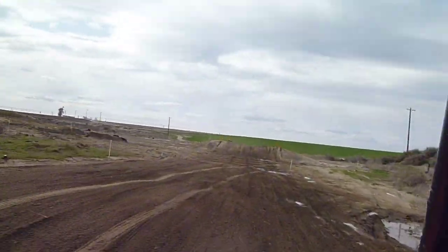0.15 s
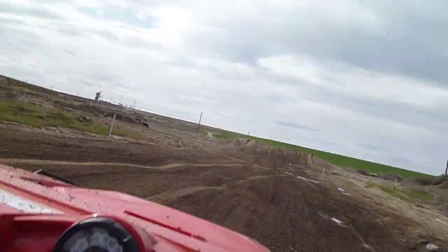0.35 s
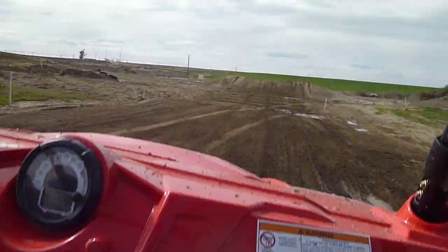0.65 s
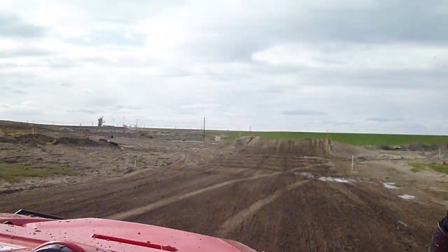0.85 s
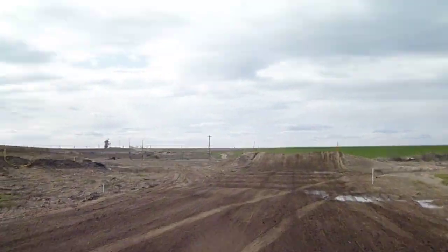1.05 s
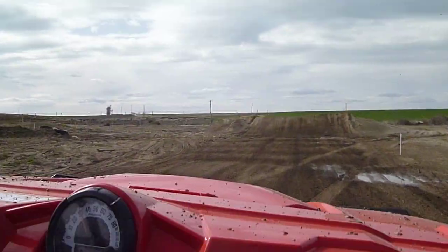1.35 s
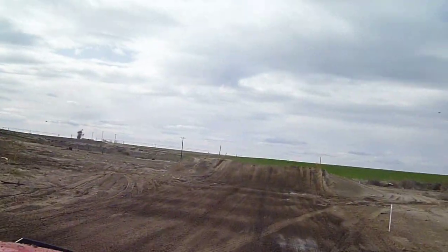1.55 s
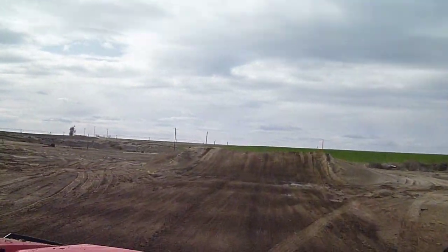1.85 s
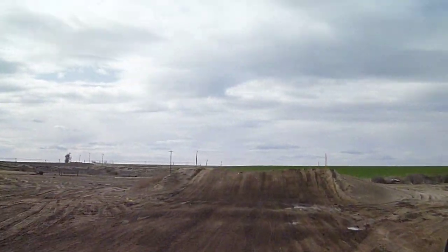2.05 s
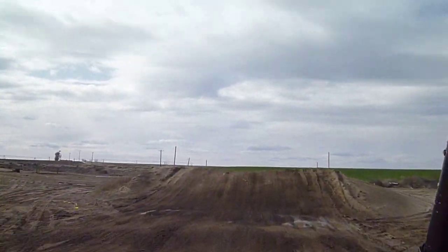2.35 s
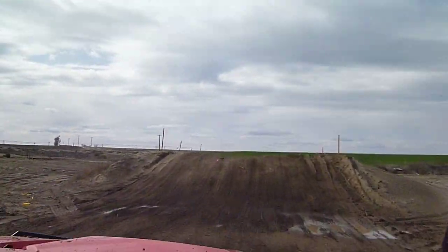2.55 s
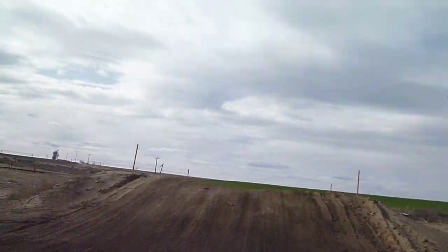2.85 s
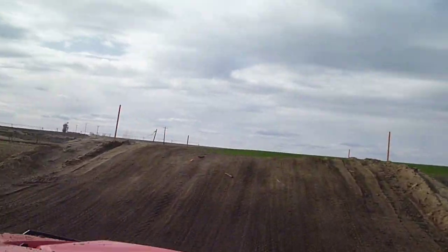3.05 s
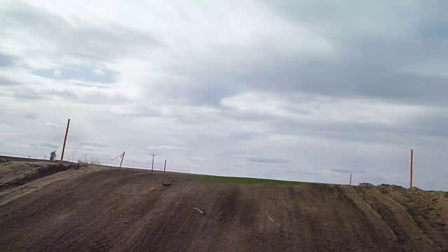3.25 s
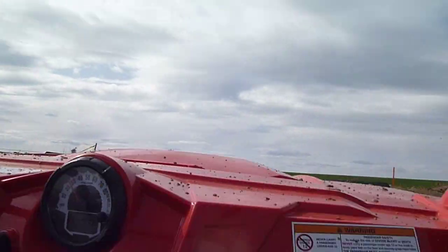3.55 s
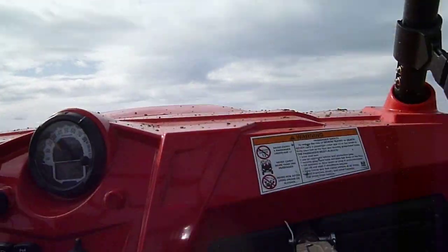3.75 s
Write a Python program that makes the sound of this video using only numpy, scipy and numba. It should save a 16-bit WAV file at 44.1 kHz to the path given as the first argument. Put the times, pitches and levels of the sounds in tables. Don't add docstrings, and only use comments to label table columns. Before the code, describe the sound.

A small off-road buggy engine drones, sags in pitch, then revs up sharply over a bumpy dirt track.

```python
import sys
import numpy as np
from scipy import signal
from scipy.io import wavfile
from scipy.ndimage import uniform_filter1d
from numba import njit

SR = 44100
rng = np.random.default_rng(int(sys.argv[2]) if len(sys.argv) > 2 else 0)


def persist_wave(psi):
    counts = np.round(np.clip(psi, -1, 1) * 32767).astype(np.int16)
    wavfile.write(sys.argv[1], SR, np.atleast_2d(counts).T)


def boost_factor(decibels):
    exponent = np.asarray(decibels, float) / 20
    return 10 ** exponent


N = 171990
T_S = np.arange(N) / SR


def curve(table, axis=1):
    rows = np.array(table)
    return np.interp(T_S, rows[:, 0], rows[:, axis])


def unit(x):
    return x / np.sqrt(np.mean(x ** 2))


def noise():
    return rng.standard_normal(N)


@njit
def bandpass(x, hz, width_hz):
    y, band, low = np.empty(len(x)), 0., 0.
    g, k = np.tan(np.pi * hz / SR), width_hz / hz
    for i in range(len(x)):
        v = (band + g * (x[i] - low)) / (1 + g * (g + k))
        band, low, y[i] = 2 * v - band, low + 2 * g * v, k * v
    return y


def walk(rate_hz):
    hold = int(SR / rate_hz)
    steps = np.repeat(rng.standard_normal(N // 20), hold)[:N]
    return unit(uniform_filter1d(uniform_filter1d(steps, hold), hold))


# (centre [Hz], width [Hz], level [dB])
CHASSIS_MODES = [
    (108, 30, -3),
    (150, 36, -3),
]
# (time [s], level [dB])
RIDE_ROUGHNESS = [(0, -10), (.05, -28), (.2, -28), (.5, -33), (.78, -27), (1.08, -23.5), (1.32, -25),
                  (1.45, -35), (1.65, -34.5), (2.22, -28.5), (2.41, -22), (2.52, -37.5), (2.7, -34),
                  (2.82, -15.5), (2.93, -24.5), (3.0, -31.5), (3.4, -35), (3.9, -35)]


def chassis():
    boom = 0
    for hz, width_hz, db in CHASSIS_MODES:
        mode = bandpass(bandpass(noise(), hz, width_hz), hz, width_hz)
        boom = boom + boost_factor(db) * unit(mode)
    return boom * boost_factor(curve(RIDE_ROUGHNESS))


# (time [s], level [dB])
GUST_LEVEL = [(0, -38), (.13, -34), (.35, -32), (.53, -34), (.68, -34.5), (.9, -31), (1.22, -33.5),
              (1.34, -30.5), (1.45, -30.5), (1.52, -33.5), (2.2, -34.5), (2.45, -32.5), (2.8, -32),
              (2.98, -33), (3.0, -44.5), (3.29, -38), (3.4, -32), (3.9, -41)]
# (time [s], lift [dB], half length [s])
GUST_PUFFS = [(0.406, 2, 0.012), (0.424, 3, 0.013), (0.732, -0.5, 0.0077), (0.965, 1.5, 0.022),
              (0.986, -6, 0.031), (1.061, 1, 0.0075), (1.155, 5.5, 0.0092), (1.177, 5, 0.0051),
              (0.098, 2.5, 0.021), (0.559, 3, 0.0066), (0.845, -2.5, 0.018), (1.286, 1, 0.025),
              (1.394, 0, 0.014), (1.614, -0.5, 0.009), (1.896, 3, 0.0061), (1.952, 1, 0.015),
              (2.145, 1.5, 0.011), (2.434, 1.5, 0.012), (2.496, 2, 0.015), (2.544, 2.5, 0.0092),
              (2.616, 0.5, 0.017), (2.686, 5, 0.011), (3.197, 2.5, 0.0053), (3.4, 2.5, 0.007),
              (3.446, 5, 0.0054), (1.71, 9.5, 0.0066), (1.75, 0.5, 0.0039), (2.037, -1, 0.014),
              (2.076, 1, 0.0056), (2.813, 2.5, 0.0063), (2.862, -2.5, 0.041), (2.916, 2, 0.013),
              (2.971, -7.5, 0.018), (3.354, 6, 0.0082)]


def gusts():
    level_db = curve(GUST_LEVEL)
    for s, db, half_s in GUST_PUFFS:
        level_db = level_db + db * np.exp(-.5 * ((T_S - s) / half_s) ** 2)
    return level_db


# (frequency [Hz], level [dB per Hz])
WIND_SPECTRUM = [(30, -20), (50, -10), (110, -1.5), (220, -2), (450, -14.5), (900, -28.5), (1700, -43.5),
                 (2900, -58)]
# (time [s], tilt [dB per octave])
GUST_BRIGHTNESS = [(0, -1.5), (.42, -0.5), (.55, 4.5), (.65, 2.5), (1.25, -0.5), (1.3, 4.5), (1.46, 2.5),
                   (1.52, 0), (1.9, -3), (2.8, 1), (3.0, -5), (3.9, 1)]


def wind(gust_db):
    wind_db, gust_tilt_per_octave, buffet_db, flicker_db = 12, .045, 1, 2
    buffet, bright = walk(90), curve(GUST_BRIGHTNESS)
    swing_db = gust_db - gust_db.mean()
    rows = np.array(WIND_SPECTRUM)
    out = 0
    for hz in 32 * np.sqrt(2) ** np.arange(14):
        band = bandpass(bandpass(bandpass(noise(), hz, hz / 2), hz, hz / 2), hz, hz)
        lean = 1 + gust_tilt_per_octave * np.log2(hz / 800)
        db = np.interp(np.log(hz), np.log(rows[:, 0]), rows[:, 1])
        db = db + lean * (swing_db + buffet_db * min(hz / 350, 1) * buffet)
        db = db + flicker_db * walk(min(55, hz / 4))
        if hz < 2500:
            db = db + bright * np.clip(np.log2(hz / 400), 0, 1.6)
        out = out + boost_factor(db) * band
    return unit(out) * boost_factor(gust_db.mean() + wind_db)


# (centre [Hz], width [Hz], level [dB])
PANEL_MODES = [
    (2700, 1300, -.5),
    (4100, 1500, 0),
    (5400, 1700, -1),
]
# (time [s], rate [turns/s])
SHAFT_SPEED = [(0, 58.6), (.3, 48.69), (.45, 56.72), (.6, 61.37), (.75, 57.97), (.9, 56.57), (1.05, 58.8),
               (1.2, 53.68), (1.35, 56.2), (1.55, 59.55), (1.7, 53.13), (1.85, 55.68), (2.05, 54.09),
               (2.25, 52.87), (2.45, 55.81), (2.65, 52.15), (2.85, 51.45), (3.2, 45)]
# (time [s], level [dB])
RATTLE_LEVEL = [(0, -66.5), (.2, -62.5), (.45, -64.5), (.6, -58), (.75, -61), (.9, -60.5), (1.05, -63),
                (1.22, -65.5), (1.33, -60.5), (1.44, -61), (1.52, -54.5), (1.63, -62), (1.82, -62.5),
                (2.0, -63), (2.2, -63.5), (2.45, -59), (2.8, -60.5), (2.88, -65), (3.0, -84), (3.4, -71.5),
                (3.9, -79)]


def rattle():
    scatter_db, colour_db, burst_s, grit_db = 1.2, 1.8, .0022, .4
    rate_hz = curve(SHAFT_SPEED)
    turns = np.cumsum(rate_hz) / SR + .52

    def per_turn(spread_db):
        return boost_factor(spread_db * rng.standard_normal(400))[turns.astype(int)]

    burst = np.exp(-.5 * ((turns % 1 - .5) / rate_hz / burst_s) ** 2)
    hits = per_turn(scatter_db) * burst
    ring = 0
    for hz, width_hz, db in PANEL_MODES:
        grit = per_turn(colour_db) * noise() * boost_factor(grit_db * rng.exponential(size=N))
        mode = bandpass(bandpass(hits * grit, hz, width_hz), hz, 2 * width_hz)
        ring = ring + boost_factor(db) * mode
    return unit(ring) * boost_factor(curve(RATTLE_LEVEL))


# (frequency [Hz], level [dB rms])
CAMERA_WHINES = [
    (6222, -87),
    (7500, -89),
    (7530, -81),
    (8470, -85),
]


def camera():
    hiss_db, hiss_hz, hiss_width_hz = -64, 4300, 7000
    out = boost_factor(hiss_db) * unit(bandpass(noise(), hiss_hz, hiss_width_hz))
    for hz, db in CAMERA_WHINES:
        out = out + np.sqrt(2) * boost_factor(db) * np.sin(2 * np.pi * hz * T_S)
    return out


# (time [s], push [dB], push length [s])
MOUNT_JOLTS = [(.04, -32, .0002), (.0516, -30, .0002), (.11, -31, .0003), (.3785, -24, .00018),
               (.427, -30, .0002), (.7592, -30, .00025), (.8249, -27, .00025), (1.0724, -30, .00025),
               (1.0818, -28, .0003), (1.1708, -27, .0002), (1.3204, -31, .00015), (1.3739, -31, .00015),
               (1.5997, -32, .0002), (1.7092, -31, .0002), (1.7198, -25, .0004), (1.7514, -31, .0003),
               (1.8765, -33, .00025), (1.9652, -32, .00025), (2.0342, -29, .0002), (2.0842, -29, .00025),
               (2.1431, -31, .00025), (2.4265, -27, .00035), (2.549, -27, .00035), (2.6995, -26, .00035),
               (2.7761, -30, .00025), (2.9172, -23, .00022), (2.918, -44, .00004), (2.9293, -34, .00012),
               (2.9672, -18, .00035), (2.9676, -41, .00003), (3.188, -34, .0002), (3.3442, -29, .00025),
               (3.3907, -31, .0002), (3.41, -29, .0002), (3.442, -28, .0003), (3.812, -54, .00003)]


def thumps():
    body_hz, body_width_hz = 450, 600
    push = np.zeros(N)
    for s, db, length_s in MOUNT_JOLTS:
        push -= boost_factor(db) / (1000 * length_s) * np.exp(-.5 * ((T_S - s) / length_s) ** 2)
    return bandpass(push, body_hz, body_width_hz)


# (time [s], firing rate [Hz], drone level [dB], third-order lift [dB])
ENGINE_RUN = [(0.0, 99, -41.5, 11.5), (0.09, 101.5, -23, -2), (0.5, 103.9, -24.5, 0),
              (0.6, 97.57, -21.5, -1), (0.9, 94.6, -26, 2.5), (1.01, 86.53, -28, 3), (1.25, 92, -31, 9.5),
              (1.42, 84.83, -27.5, 2), (1.61, 84.3, -26, 1.5), (1.8, 73.2, -25.5, -9.5),
              (2.06, 81.2, -27, 1), (2.24, 82.44, -21, -6.5), (2.54, 79.28, -29, 1),
              (3.14, 82.1, -27.5, -3.5), (3.46, 91.6, -26, 0), (3.63, 104.2, -21, -2.5),
              (3.75, 101.5, -19.5, -3.5), (3.9, 99.6, -21, -1.5)]
# (multiple of firing rate [1], level [dB])
EXHAUST_ORDERS = [(.5, -14.5), (1, -13), (1.5, -4.5), (2, 0.5), (2.5, -15), (3, -3), (3.5, -24.5),
                  (4, -21.5), (5, -33), (5.5, -25), (6, -32), (6.5, -23), (7, -21.5), (7.5, -22)]
# (time [s], half-order lift [dB])
ENGINE_LOPE = [(0, -7), (.3, -0.5), (.55, -2), (.9, 2), (1.1, 9.5), (1.45, -0.5), (1.7, 3), (2.0, 3.5),
               (2.4, 0.5), (2.6, 4.5), (2.9, 3.5), (3.05, -2), (3.3, -2.5), (3.4, 7.5), (3.58, 7),
               (3.65, -10.5), (3.9, -10.5)]


def engine():
    wobble_db, wobble_hz, speed_jitter = 1.5, 16, .004
    muffler_hz, muffler_db_per_octave = 580, -14
    rasp_db, rasp_hz, rasp_width_hz, rasp_tail_turns = -50, 610, 507, .92
    firing_hz = curve(ENGINE_RUN, axis=1)
    third_db, lope_db = curve(ENGINE_RUN, axis=3), curve(ENGINE_LOPE)
    turns = np.cumsum(firing_hz * (1 + speed_jitter * walk(25.082))) / SR
    drone = 0
    for order, db in EXHAUST_ORDERS:
        if order % 1:
            db = db + lope_db
        elif order == 3:
            db = db + third_db
        db = db + muffler_db_per_octave * np.maximum(np.log2(order * firing_hz / muffler_hz), 0)
        db = db + wobble_db * walk(wobble_hz)
        phase_turns = order * turns + .069 * walk(3.286)
        drone = drone + boost_factor(db) * np.cos(2 * np.pi * phase_turns)
    puffs = np.exp(-(turns % 1) / rasp_tail_turns) * noise()
    rasp = bandpass(bandpass(puffs, rasp_hz, rasp_width_hz), rasp_hz, 2 * rasp_width_hz)
    return np.sqrt(2) * boost_factor(curve(ENGINE_RUN, axis=2)) * drone + boost_factor(rasp_db) * unit(rasp)


# (time [s], gain change [dB], recovery [s])
GAIN_DIPS = [
    (0.442, -5, 0.013),
    (.964, -5, 0.024),
    (1.1, -3, 0.045),
    (1.455, -6, 0.0076),
    (1.726, 2, 0.017),
    (1.986, 0.5, 0.012),
    (2.834, -9, 0.022),
    (2.945, 7, .02),
    (3.89, -19, 0.042),
]


def ducking():
    attack_s = .006
    gain_db = 0
    for s, db, recovery_s in GAIN_DIPS:
        after_s = np.maximum(T_S - s, 0)
        gain_db = gain_db + db * (1 - np.exp(-after_s / attack_s)) * np.exp(-(after_s / recovery_s) ** 2)
    return boost_factor(gain_db)


def gears():
    mesh_hz, level_db, start_s, rise_s = 2185, -64, 3.68, .06
    whine = np.sin(2 * np.pi * np.cumsum(mesh_hz * (1 + .004 * walk(15))) / SR)
    return boost_factor(level_db) * np.clip((T_S - start_s) / rise_s, 0, 1) * whine


def scene():
    ride = chassis() + wind(gusts()) + rattle() + engine() + gears()
    return (ducking() * ride + thumps() + camera())[None, :]


def low_pass(x):
    return signal.sosfilt(signal.butter(12, 8780, fs=SR, output="sos"), x)


def record(dry):
    ceiling, knee, offset, top_hz = .335, 5.0, .0175, 7420
    biased = dry + offset
    held = biased / (1 + np.abs(biased / ceiling) ** knee) ** (1 / knee)
    lowpass = signal.cheby1(4, .5, top_hz, fs=SR, output="sos")
    mix = signal.sosfiltfilt(lowpass, held)
    return low_pass(mix)


dry = scene()
out = record(dry)
persist_wave(out)
```